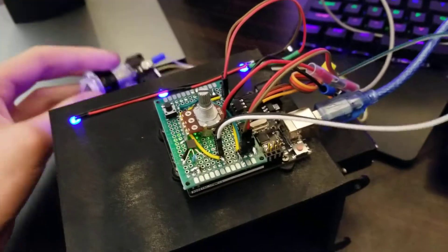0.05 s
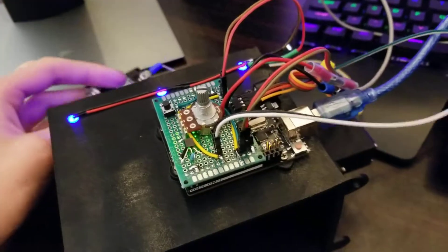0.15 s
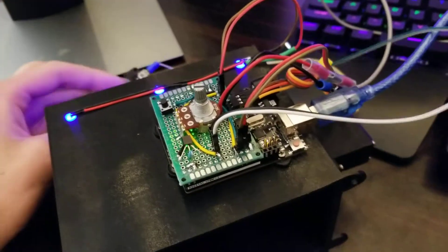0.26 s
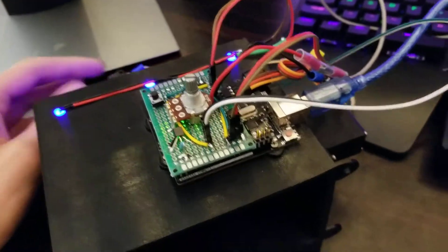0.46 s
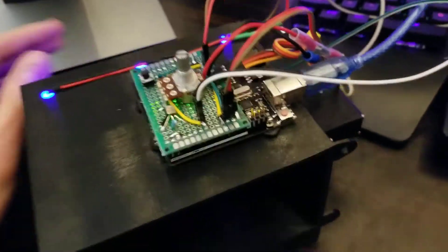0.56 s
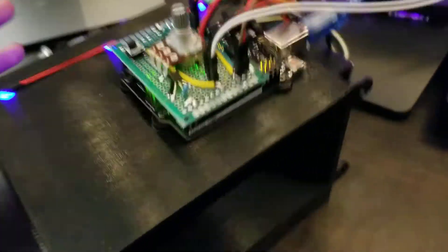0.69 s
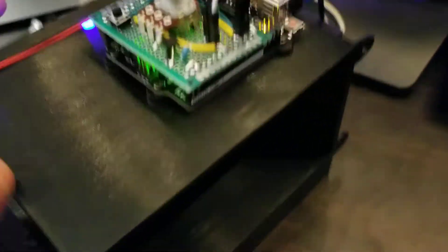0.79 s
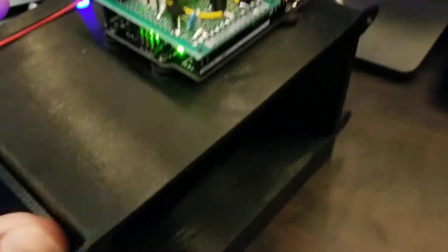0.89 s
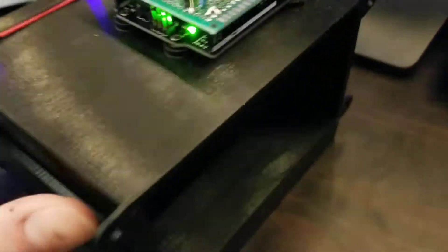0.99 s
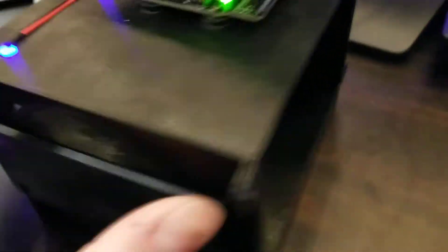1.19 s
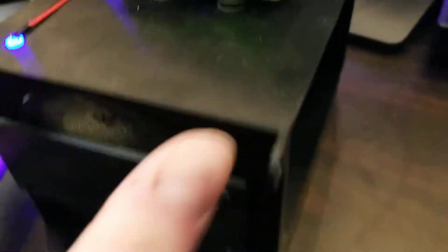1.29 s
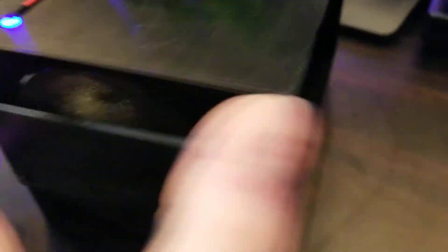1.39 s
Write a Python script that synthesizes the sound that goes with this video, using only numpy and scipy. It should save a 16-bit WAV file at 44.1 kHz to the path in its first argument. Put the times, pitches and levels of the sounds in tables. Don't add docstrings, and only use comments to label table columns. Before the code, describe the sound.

A small geared motor runs once in a plastic box. A button clicks at 0.04 s; a faint relay tick at 0.17 starts a harsh, uneven whine, rising until about 0.35 and rattling the housing. A part knocks inside at 0.45. Power cuts near 0.88, coasting down by 0.96. Soft hand taps and scraping slides follow at 1.07 and 1.35, over faint room hiss and hum, heard close with short room echo.

```python
import sys
import numpy as np
from scipy import signal
from scipy.fft import rfft, irfft
from scipy.io import wavfile
from scipy.ndimage import uniform_filter1d

SR = 44100
rng = np.random.default_rng(int(sys.argv[2]) if len(sys.argv) > 2 else 0)


def amplitude_ratio(level_db):
    exponent = np.asarray(level_db, float) / 20
    return 10 ** exponent


def int16_out(signal):
    q = np.round(np.clip(np.atleast_2d(signal).T, -1, 1) * 32767)
    wavfile.write(sys.argv[1], SR, q.astype(np.int16))


N = 63945
T = np.arange(N) / SR
HZ = np.fft.rfftfreq(N, 1 / SR)
SIDES = np.array([[0.5], [-0.5]])
LAG_S = 0.00008


def evened(x):
    return x / np.sqrt(np.mean(x ** 2) + 1e-20)


def read(points, hz):
    point_hz, value = np.transpose(points)
    return np.interp(np.log(hz + 1), np.log(point_hz + 1), value)


def resonate(x, hz, width_hz):
    turn = np.exp(2j * np.pi * hz * T)
    r = np.exp(-np.pi * width_hz / SR)
    return 2 * (turn * signal.lfilter([1 - r], [1, -r], x / turn)).real


def ring_twice(x, hz, width_hz):
    return evened(resonate(resonate(x, hz, width_hz), hz, width_hz))


def slow(hz):
    noise = uniform_filter1d(rng.standard_normal(N), size=60)
    return evened(signal.lfilter([1], [1, -np.exp(-2 * np.pi * hz / SR)], noise))


def colour(x, points, tilt_db=0):
    gain = amplitude_ratio(read(points, HZ) + tilt_db * np.log2(HZ / 1000 + 0.1))
    return evened(irfft(rfft(x) * gain, N))


def grains(per_s, spread_db):
    size = amplitude_ratio(spread_db * np.minimum(rng.exponential(1, (2, N)), 5)) * rng.standard_normal((2, N))
    return evened(size * (rng.random((2, N)) < per_s / SR))


# pitch_hz, likeness (0 to 1)
SAME = [(60, 0.82), (700, 0.78), (1500, 0.13), (5500, 0.65), (10000, 0.046), (15000, 0.083)]


def ports(a, b, side, lag_s=0.0):
    a, b = rfft(a), rfft(b)
    same = np.clip(read(SAME, HZ), 0, 1)
    half = amplitude_ratio(read(side, HZ) / 2)
    left = a * half * np.exp(-2j * np.pi * HZ * lag_s)
    right = (same * a + np.sqrt(1 - same ** 2) * b) / half
    return irfft([left, right], N)


# pitch_hz, left_right_db
EVEN = ((1, 0), (2, 0))
# pitch_hz, level_db
FLOOR = [(40, 10.5), (220, -3), (1300, -20), (4200, -19.5), (6000, -25), (9000, -34), (13000, -19.5)]
# pitch_hz, level_db
HUM = [(118, -60)]


def floor():
    hiss = colour(ports(*rng.standard_normal((2, N)), EVEN), FLOOR)
    hum = sum(amplitude_ratio(db + 2 * slow(18)) * np.sin(2 * np.pi * hz * T) for hz, db in HUM)
    return amplitude_ratio(-59.5) * hiss + hum


# pitch_hz, time_to_fall_60_db_s
ROOM = [(200, 0.5), (1000, 0.3), (6000, 0.21), (14000, 0.18)]


def room(x):
    taps = np.zeros((2, SR // 2))
    at = np.arange(200, SR // 2 - 20, 20) + rng.integers(0, 20, (2, (SR // 2 - 201) // 20))
    np.put_along_axis(taps, at, rng.choice([-1.0, 1.0], at.shape), 1)
    hz, t, bands = signal.stft(taps, SR, nperseg=256)
    fading = bands * amplitude_ratio(-60 * t / read(ROOM, hz)[:, None])
    tail = signal.istft(fading, SR, nperseg=256)[1]
    return signal.fftconvolve(x, tail / np.linalg.norm(tail[0]), axes=1)[:, :N]


# pitch_hz, left_right_db
SIDEWAYS = [(60, 3.5), (180, 0), (550, 4.5), (1650, 3.5), (4970, -0.5), (15000, -14)]
# start_s, length_s, pitch_hz, width_hz, level_db
SQUEAKS = [(1.13, 0.14, 743, 33.6, -49), (1.38, 0.042, 2410, 111.3, -48), (1.378, 0.045, 4860, 178, -54),
           (0.132, 0.017, 4200, 160, -63), (1.352, .008, 3500, 150, -53), (1.1, .012, 3200, 150, -49),
           (1.378, .03, 12700, 300, -59), (.185, 0.11, 78, 21, -46), (0.213, 0.0604, 250, 20.5, -34.5),
           (.2, 0.062, 700, 150, -34.5), (.195, 0.026, 200, 30, -40.5), (.59, 0.053, 240, 25, -38.5),
           (0.215, 0.041, 1550, 25, -38), (0.306, 0.058, 185, 17, -33.5), (.305, 0.038, 800, 90.6, -35),
           (0.394, .08, 250, 34.2, -40.5), (0.481, 0.096, 110, 21.7, -44),
           (0.487, 0.1647, 260, 45.4, -43.5), (0.691, 0.18, 839, 4.3, -41.5), (0.66, 0.075, 4250, 30, -35),
           (.73, .12, 5300, 60, -39), (0.002, 0.054, 750, 91, -52)]


def squeaks():
    out = np.zeros((2, N))
    for start_s, length_s, hz, width_hz, db in SQUEAKS:
        pitch = hz + width_hz * slow(3 * width_hz)
        tone = np.sin(2 * np.pi * np.cumsum(pitch) / SR) * amplitude_ratio(3.1 * slow(81))
        swell = np.sin(np.pi * np.clip((T - start_s) / length_s, 0, 1))
        out += amplitude_ratio(db + read(SIDEWAYS, hz) * SIDES) * tone * swell
    return out


# pitch_hz, left_right_db
HAND_SIDE = [(60, 10), (380, 2.5), (2380, 1), (15000, -11.5)]
# start_s, rise_s, hold_s, fall_s, level_db
SLIDES = [
    (1.071, 0.065, 0.056, 0.12, -44),
    (1.346, 0.037, 0.03, 0.09, -51.5),
    (1.423, 0.011, 0.017, 0.038, -53.5),
]
# pitch_hz, level_db
SLIDE = [(47, -54), (80, -44), (208, -9.5), (751, -6), (1950, -14), (5900, -18.5), (8990, -31.5),
         (12300, -25), (16000, -40)]
SLIDE_TILT_DB = [0.5, 0, -12]


def slides():
    out = np.zeros((2, N))
    for (start_s, rise_s, hold_s, fall_s, db), tilt_db in zip(SLIDES, SLIDE_TILT_DB):
        corners_s = np.cumsum([start_s, rise_s, hold_s, fall_s])
        stroke_db = np.interp(T, corners_s, [-26.5, 7.0, 3.5, -23.0], -140, -140)
        slips = ports(*grains(9000, 2.1), HAND_SIDE) * amplitude_ratio(0.75 * slow(110))
        out += amplitude_ratio(db + stroke_db) * colour(slips, SLIDE, tilt_db)
    return out


# start_s, crack_db, ring_db, thud_db, snap_hz
HITS = [
    (.0385, -40.5, -29, -67, 4830),
    (.0425, -39.5, -37.5, -55, 5170),
    (.451, -29.5, -31, -37, 4830),
    (.459, -32, -33, -31, 1420),
    (1.0646, -49.5, -57, -63, 2870),
    (1.074, -55, -42.5, -38, 735),
    (1.107, -58, -41.5, -60, 797),
    (1.3426, -43.5, -60, -51, 3300),
    (1.352, -68, -41.5, -37, 692),
]
HIT_TILT_DB = [0.2, -0.2, 1, -2, -4, -8, -5, -.6, -3, -7]
# pitch_hz, level_db, time_to_fall_60_db_s
RINGS = [
    [(728, -27, 0.14), (850, 0.5, 0.06), (989, -4, 0.035), (2690, -12.5, 0.022), (4550, 2, 0.006)],
    [(1067, 1, 0.037), (1282, 4, 0.031), (1600, -10, 0.033), (1950, -19, 0.025), (4090, -2, 0.036)],
    [(725, 3, 0.083), (328, -0.5, 0.088)],
]
PART_FROM_S = [.3, 1]
# pitch_hz, level_db
CRACK = [(180, -73), (300, -49), (870, -9.5), (1720, -13), (5080, -19), (9710, -22), (16000, -11.5)]


def hits():
    out = np.zeros((2, N))
    relay = (0.167, -66, -140, -140, HOUSING[5][0])
    for (start_s, crack_db, ring_db, thud_db, snap_hz), tilt_db in zip(list(HITS) + [relay], HIT_TILT_DB):
        t = np.maximum(T - start_s, 0)
        noise = colour(ports(*rng.standard_normal((2, N)), HAND_SIDE), CRACK, tilt_db)
        noise = noise + 2.5 * evened(resonate(noise, snap_hz, 0.55 * snap_hz))
        crack = noise * (amplitude_ratio(crack_db - 60 * t / 0.011) + amplitude_ratio(crack_db - 17.5 - 60 * t / 0.13))
        ring = 0
        for hz, db, t60_s in RINGS[np.searchsorted(PART_FROM_S, start_s)]:
            fade = amplitude_ratio(db - 60 * t / t60_s + 1.2 * slow(180))
            ring = ring + fade * np.sin(2 * np.pi * hz * t + 0.4 * slow(153))
        thud = amplitude_ratio(thud_db - 60 * t / 0.035) * np.sin(2 * np.pi * 147 * t)
        onset = (T > start_s) * np.minimum(t / 0.001, 1)
        out += onset * (crack + amplitude_ratio(ring_db) * ring + thud)
    return out


# pitch_hz, width_hz, level_db
BOX = [(190.4, 44, -0.5), (262.3, 42, -3.5), (482, 160, -5.5), (760, 202, 2), (1002, 86, -10.5)]


def box_boom():
    shake = ports(*grains(1500, 1.5), SIDEWAYS, LAG_S)
    return sum(amplitude_ratio(db) * ring_twice(shake, hz, width_hz * 1.72) for hz, width_hz, db in BOX)


# pitch_hz, width_hz, level_db, left_right_db
HOUSING = [(1600, 160, -20, 1), (2230, 390, -19, 8), (4243, 234, -7.5, 2), (4750, 173, -10, -8),
           (5176, 210, -5.5, 0), (5776, 420, -2.5, -13.5), (7170, 320, -15, -13), (7910, 430, -21.5, -11),
           (12560, 260, -17, -11.5), (10600, 300, -20.5, -2), (13040, 1600, -13.5, -16.5),
           (14400, 700, -23, -21)]
DRIFT_DB_PER_S = [-10, -2, 2.5, -1, 6, -3.5, -14, -10, -14, -1, -2.5, 5]


def housing_rings(rattle):
    moved_s = np.minimum(T, 0.885) - 0.5
    out = 0
    for (hz, width_hz, db, side_db), drift_db in zip(HOUSING, DRIFT_DB_PER_S):
        mode_db = db + side_db * SIDES + drift_db * moved_s + 1.4 * slow(14)
        out = out + amplitude_ratio(mode_db) * ring_twice(rattle, hz, width_hz * 1.87)
    return out


def mesh_tone(multiple, mesh_hz, turns):
    return np.cos(2 * np.pi * multiple * (turns - mesh_hz * LAG_S * SIDES))


def whine(multiple, mesh_hz, turns):
    answer = sum(amplitude_ratio(db + side_db * SIDES) / (1 + ((multiple * mesh_hz - hz) / (0.75 * width_hz)) ** 4)
                 for hz, width_hz, db, side_db in HOUSING)
    return answer * mesh_tone(multiple, mesh_hz, turns)


# multiple, level_db, left_right_db
MESH = [
    (1, -10, 2),
    (2, -28, 1),
]


def gear_tones(mesh_hz, turns, catch_db):
    low = sum(amplitude_ratio(db + side_db * SIDES + 2.2 * slow(49)) * mesh_tone(multiple, mesh_hz, turns)
              for multiple, db, side_db in MESH)
    high = sum(whine(multiple, mesh_hz, turns) for multiple in (3, 4))
    high = high * amplitude_ratio(5 + catch_db + 2.2 * slow(180))
    unload_db = -20 * np.clip((T - 0.885) / 0.04, 0, 1)
    return (low + high) * amplitude_ratio(unload_db)


# time_s, mesh_hz, drive_db, left_right_db as the microphone turns
RUN = [(0.1788, 1392, -42.5, 2), (.197, 1505, -42, -1), (.202, 1524, -33, -4.5), (0.224, 1600, -31, -3),
       (.255, 1825, -34, -5), (.285, 1950, -32.5, -1.5), (0.331, 2045, -32.5, -3.5),
       (0.381, 2064, -31.5, 1.5), (.52, 2091, -31, 0.5), (0.702, 2122, -31.5, 5), (0.779, 2115, -32.5, 3),
       (.845, 2133, -32.5, 3.5), (.885, 1980, -33, 4.5), (0.915, 1900, -39, 4.5), (0.963, 1835, -57, 5)]
# middle_s, length_s, level_db
CATCHES = [(.205, 0.0086, 2.5), (.214, .006, -7), (0.222, .008, 2), (0.229, .009, 3.5), (.244, .004, -1),
           (.255, 0.014, 5), (0.266, .009, 4.5), (0.276, 0.0082, -7), (0.286, .007, 6.5),
           (0.294, 0.0071, -5), (0.306, 0.0093, 4), (0.317, .006, 1.5), (.332, .006, 3.5),
           (0.338, 0.0044, 2), (0.356, .006, 3), (0.362, .008, -3.5), (0.373, .006, 3),
           (0.411, 0.0054, 3.5), (0.454, 0.0082, 6), (0.462, 0.0062, 6.5), (0.494, 0.0071, 5),
           (0.5313, 0.0039, 8.5), (0.538, 0.0077, -6.5), (.567, 0.0054, 2), (0.577, .004, -1),
           (0.603, .004, 3.5), (0.62, .008, 2), (0.672, .008, 3.5), (.695, 0.0049, 4), (0.702, .005, 1),
           (.714, .005, 0.5), (.817, 0.0067, 2), (0.832, 0.0061, 2), (0.87, 0.0059, 2), (0.913, .007, 4.5)]
# pitch_hz, level_db
GEAR_HISS = [(35, -50), (60, -17), (193, -12.5), (1660, -8.5), (2140, -8), (3340, -5), (5860, -38),
             (6900, -10), (16000, -16)]


def motor():
    time_s, run_hz, drive_db, turn_db = np.transpose(RUN)
    drive = amplitude_ratio(np.interp(T, time_s, drive_db, -140, -140))
    mesh_hz = np.interp(T, time_s, run_hz)
    camera_turn = amplitude_ratio(np.interp(T, time_s, turn_db) * SIDES)
    catch_db = sum(db * np.exp(-((T - middle_s) / (length_s / 2)) ** 4)
                   for middle_s, length_s, db in CATCHES)
    turns = np.cumsum(mesh_hz * (1 + 0.004 * slow(84))) / SR
    teeth = grains(9000, 2) * (1 + 0.5 * np.cos(2 * np.pi * turns)) * amplitude_ratio(0.7 * slow(50))
    rings = housing_rings(ports(*teeth, EVEN, LAG_S)) * amplitude_ratio(0.69 * catch_db)
    hiss = amplitude_ratio(-4) * colour(ports(*teeth[::-1], SIDEWAYS, LAG_S), GEAR_HISS) * amplitude_ratio(catch_db / 2)
    tones = gear_tones(mesh_hz, turns, catch_db)
    return drive * ((rings + tones) * camera_turn + hiss + amplitude_ratio(-16) * box_boom())


def scene():
    near = motor() + hits() + slides() + squeaks()
    return near + amplitude_ratio(-9.5) * ports(*room(near), EVEN) + floor()


def band_limit(x):
    return signal.sosfilt(signal.butter(12, 16850, fs=SR, output="sos"), x)


# pitch_hz, width_hz
DIPS = [(3050, 215), (9500, 680)]


def record(dry):
    bass_cut = HZ ** 2 / (HZ ** 2 + 45 ** 2)
    top_edge = np.clip((15780 - HZ) / 150, 0.004, 1)
    dips = amplitude_ratio(sum(-5.5 * np.exp(-((HZ - hz) / width_hz) ** 2) for hz, width_hz in DIPS))
    mix = irfft(rfft(dry) * top_edge * bass_cut * dips, N)
    return band_limit(mix)


dry = scene()
out = record(dry)
int16_out(out)
```